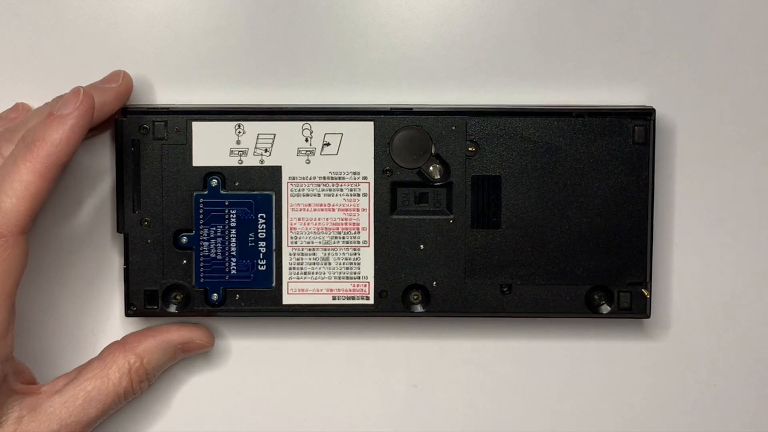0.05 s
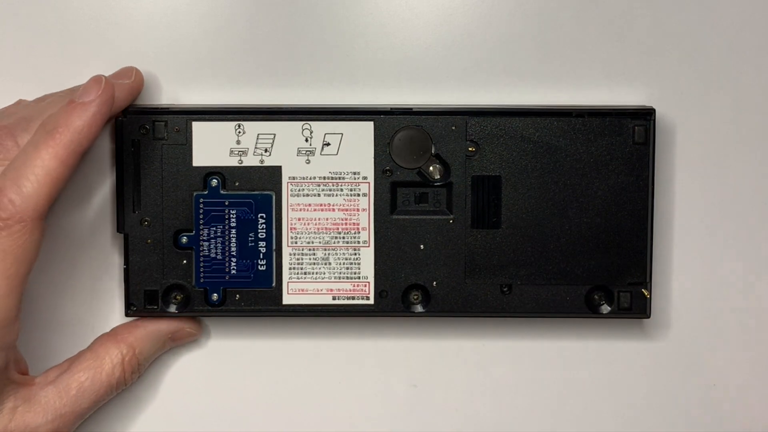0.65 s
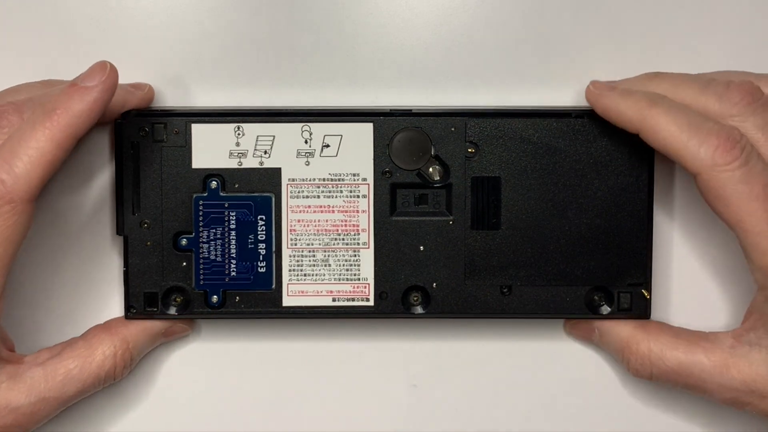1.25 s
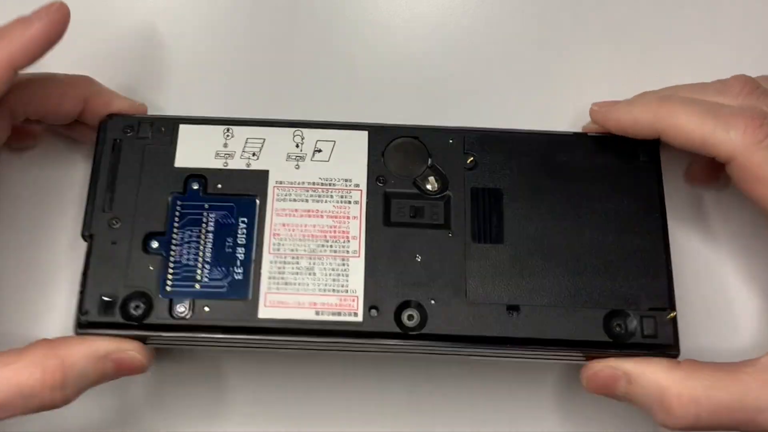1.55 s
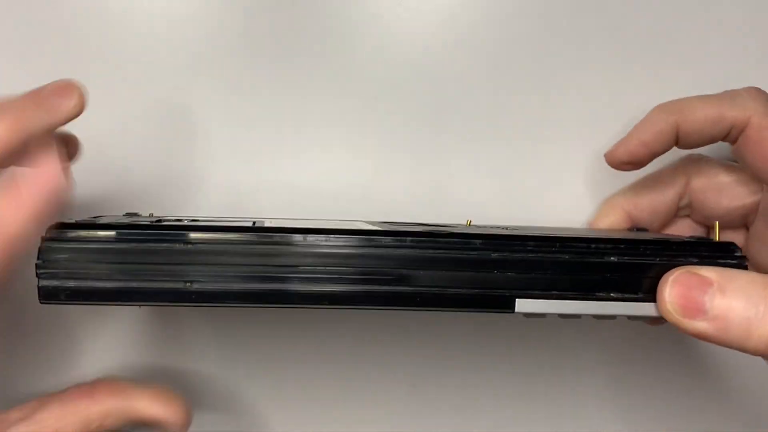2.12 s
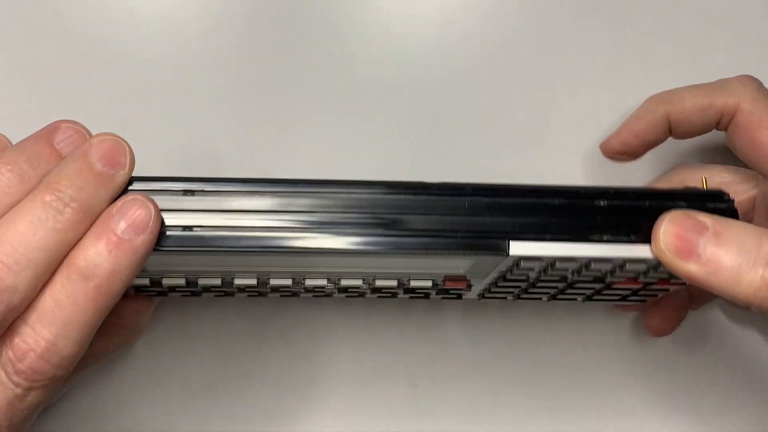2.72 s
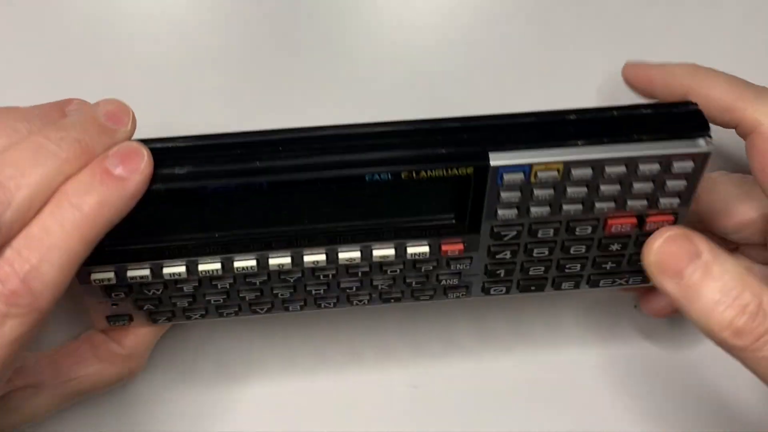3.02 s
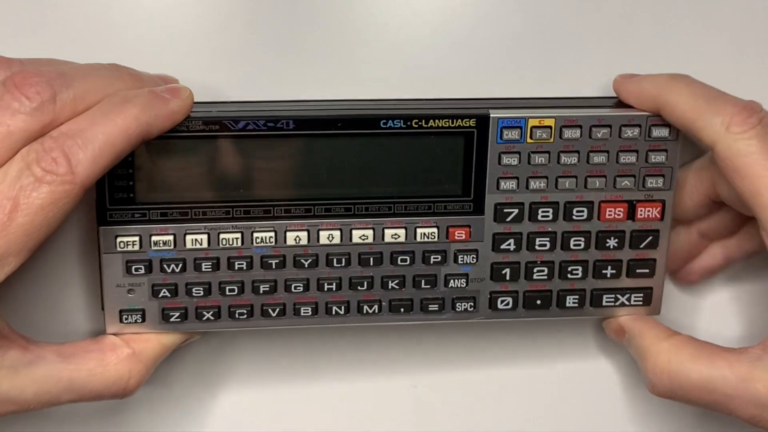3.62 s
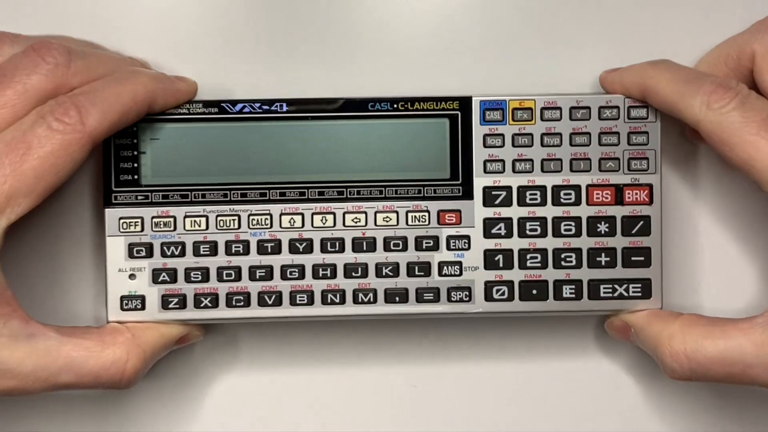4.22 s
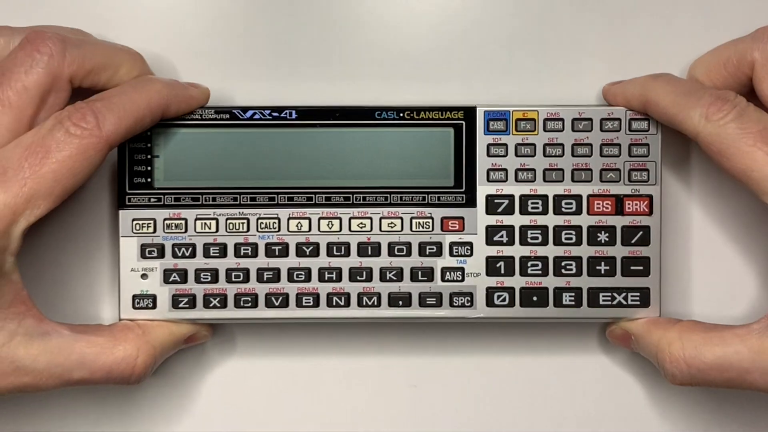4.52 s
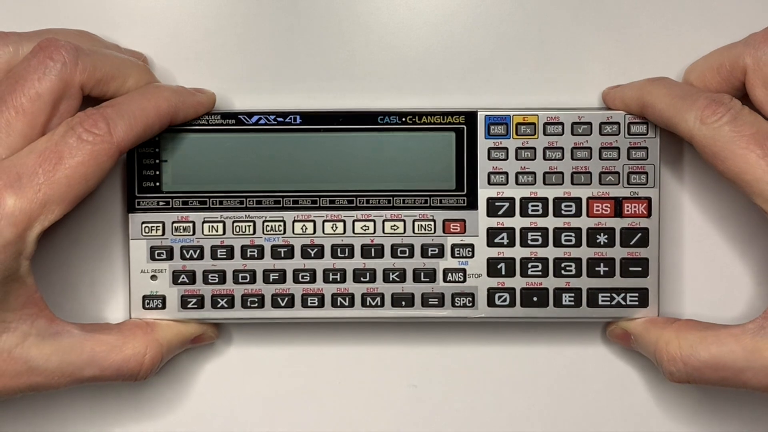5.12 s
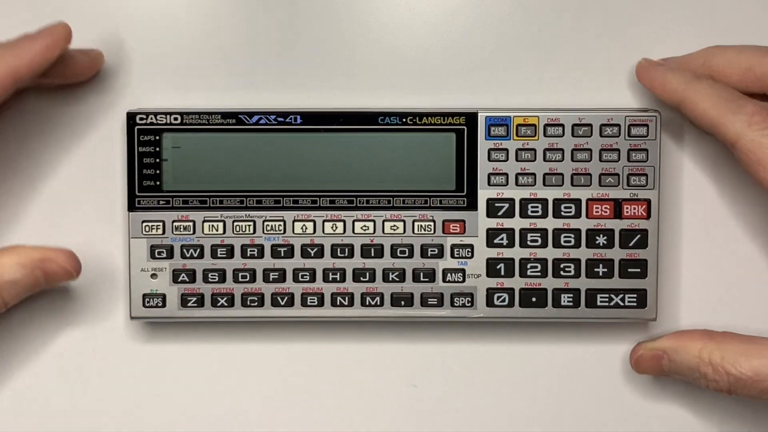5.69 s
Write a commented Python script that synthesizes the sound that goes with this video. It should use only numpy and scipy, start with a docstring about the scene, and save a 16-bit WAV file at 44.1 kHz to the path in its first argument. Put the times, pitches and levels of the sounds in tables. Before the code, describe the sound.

A small plastic device gives a couple of sharp, slightly rattling snaps as it is gripped. Light ticks and taps follow while hands turn it over, with soft rubbing, faint creaks and a brief finger squeak. Near the end it knocks onto a desk and rocks to rest with smaller bumps and a tiny metallic ping. The microphone is close, in a small room with a low ventilation rumble.

```python
"""Pocket computer handled at a desk

A small room, a stereo microphone close to the desk. A pocket computer in a plastic case is picked up,
turned over and set down. The case snaps and rings while it lies free, ticks dully once the hands damp
it, creaks and squeaks under sliding fingers, and at last knocks the desk top, jolting a loose metal
part. The room answers briefly, with a low ventilation rumble behind it all."""
import sys
import numpy as np
from scipy import signal
from scipy.fft import rfft, irfft, next_fast_len
from scipy.io import wavfile
from scipy.ndimage import uniform_filter1d

SR = 44100
rng = np.random.default_rng(int(sys.argv[2]) if len(sys.argv) > 2 else 0)


def wav_record(signal):
    """Record a signal, one row per channel, as 16-bit PCM in the file named by sys.argv[1]."""
    frames = np.transpose(np.atleast_2d(signal))
    bounded = np.clip(frames, -1, 1)
    # unit amplitude maps onto the largest positive 16-bit level
    quanta = np.round(bounded * 32767).astype(np.int16)
    wavfile.write(sys.argv[1], SR, quanta)


N = 253575


# snaps and their quick rebounds, close to the microphone: start_s, level_db, cutoff_hz, crack_db
SNAPS = [(0.1518, -30.5, 4200, -3.5), (0.1553, -30, 2000, -22), (0.161, -34, 1720, -13),
         (0.3227, -40, 14000, -13), (0.3357, -20.5, 17800, 2), (0.3375, -23.5, 13100, -0.5),
         (0.346, -40, 12000, 12)]
# modes of the case lying free on the desk: pitch_hz, level_db, t60_s
FREE_CASE_MODES = [(560, -30, 0.068), (760, -16, 0.061), (1175, 1, 0.079), (1375, -0.5, 0.03),
                   (1603, -2, 0.032), (1960, -1.5, 0.025), (2330, -17, 0.045), (2920, 7.5, 0.011),
                   (3760, 5, 0.0054), (4050, -15, 0.08), (6400, 12, 0.005), (7070, 12, 0.0064),
                   (8230, 4, 0.015), (8660, 11.5, 0.0071), (10600, 7.5, 0.005), (14200, 17, 0.0043)]

def snaps(rattle_db=-12):
    """A fingernail snaps against the case as it lies free on the desk; it rings freely and rattles."""
    out = np.zeros((2, N))
    for s, db, cutoff_hz, crack_db in SNAPS:
        hit = blow(FREE_CASE_MODES, cutoff_hz, crack_db, crack_t60=0.01, apart_hz=8100,
                   rise_cycles=0.58, crack_rise_s=0.0001)
        add(out, s, amp(db) * (with_room(hit, wet_db=-6) + amp(rattle_db) * rattle(cutoff_hz)))
    return out


# spectrum of chattering keys and covers: frequency_hz, density_db
CHATTER_SPECTRUM = [(150, -5), (550, 5.5), (900, 13.5), (2500, 2.5), (3800, 3), (4900, -3), (7000, -2),
                    (10500, -6), (15000, -23)]

def rattle(cutoff_hz, contacts_per_s=2500, scatter_db=4, t60=0.23):
    """Loose keys and covers chatter after a snap: dense tiny contacts that die away."""
    t = np.arange(SR * 2 // 5) / SR
    contacts = impulses(len(t), contacts_per_s, scatter_db)
    colour = lambda hz: amp(along(CHATTER_SPECTRUM, hz)) / np.hypot(1, (hz / cutoff_hz) ** 2)
    chatter = spread(filtered(contacts, colour), ROOM_LIKENESS) * amp(-60 * t / t60)
    return unit(chatter) * np.sqrt(.005 / t[-1])  # the energy of 5 ms at rms 1


# knocks on the desk: start_s, level_db, cutoff_hz, ring_share (of the ring time, left by the grip)
KNOCKS = [(1.22, -45.5, 420, 0.17), (4.8793, -18.5, 1520, 0.94), (4.902, -22, 378, 0.66),
          (4.936, -34, 260, 0.45), (5.1526, -32.5, 900, 0.74), (5.19, -28, 547, 0.45),
          (5.206, -29.5, 420, 0.46), (5.232, -30.5, 133, 0.55), (5.376, -33.5, 115, 0.9),
          (5.421, -39.5, 433, 0.9), (5.439, -25.5, 104, 0.21)]
# modes of the desk top: pitch_hz, level_db, undamped_t60_s
DESK_MODES = [(69.7, -3, 0.58), (116.7, -8, 0.55), (167, 0.5, 0.41), (200.3, -4.5, 0.21), (228.6, -2, 0.31),
              (287.5, -21.5, 0.88), (336, 21, 0.021), (388.6, -3.5, 0.22), (419, -14, 0.24),
              (475, -13.5, 0.29), (576, -10, 0.25), (701, -6.5, 0.1), (788, 7.5, 0.029), (1130, -4, 0.026)]

def knocks():
    """The gripped case nudges the desk; later one edge lands and rocks, then the other, and it settles."""
    out = np.zeros((2, N))
    for s, db, cutoff_hz, ring_share in KNOCKS:
        modes = np.array(DESK_MODES) * [1, 1, ring_share]
        hit = blow(modes, cutoff_hz, crack_db=-18, crack_t60=0.023, apart_hz=1900,
                   rise_cycles=0.53, crack_rise_s=0.00056)
        add(out, s, amp(db) * with_room(hit, wet_db=-10.5, build_s=0.0022))
    return out


# ticks against fingers or desk: start_s, level_db, cutoff_hz, shell_hz, part_hz, part_db, crack_db
TICKS = [(1.115, -58.5, 1300, 636, 1020, 25, -18), (1.2216, -45, 1490, 720, 950, 16, -22),
         (1.551, -44.5, 1630, 604, 890, 20.5, -9), (1.7277, -35, 14700, 640, 1960, 19, -3.5),
         (2.331, -58.5, 3500, 666, 2010, 17, -9), (2.6023, -32, 14200, 724, 690, 17, -5),
         (2.7862, -48.5, 1830, 890, 1500, 20.5, -1), (3.5378, -38, 12700, 703, 1300, 19.5, -3),
         (4.0235, -32.5, 980, 749, 1166, 21, -7), (4.059, -48, 1220, 850, 1200, 22, -7),
         (4.6065, -58, 14000, 890, 6840, 37, -4), (4.8767, -37, 3800, 775, 2080, 15.5, -1.5),
         (5.1495, -43.5, 2000, 710, 1950, 3, -12), (5.1868, -41, 2190, 744, 1940, 20, 3),
         (5.4197, -45.5, 2200, 666, 1280, 19.5, -2)]
# modes of the case in the hands: shell_pitch_ratio, level_db, t60_s
HELD_CASE_MODES = [(.84, -4, 0.05), (1, 10, 0.042), (1.2, -5, 0.015), (1.5, -24, .03), (2.05, 0, 0.023),
                   (2.9, 0, 0.026), (4.6, 17, 0.0076), (6.2, 11, 0.0046), (8.6, 11, .005), (15, -2, 0.0021)]

def ticks(part_t60=0.01):
    """Fingers tap and flex the case; the grip damps and retunes the shell, the touched part rings dryly."""
    out = np.zeros((2, N))
    for s, db, cutoff_hz, shell_hz, part_hz, part_db, crack_db in TICKS:
        shell = np.array(HELD_CASE_MODES) * [shell_hz, 1, 1]
        modes = np.vstack([(part_hz, part_db, part_t60), shell])
        hit = blow(modes, cutoff_hz, crack_db, crack_t60=0.013, apart_hz=4230,
                   rise_cycles=1.3, crack_rise_s=0.000057)
        add(out, s, amp(db) * with_room(hit, wet_db=-9.5, build_s=0.00063))
    return out


# pings as the case comes to rest on the desk: start_s, level_db
PINGS = [(5.4205, -42), (5.443, -53)]
# modes of the metal part: pitch_hz, level_db, t60_s
METAL_MODES = [(2660, 6, 0.029), (4150, -7, 0.022), (5630, -9, 0.028)]

def pings():
    """A small loose metal part is jolted and rings briefly."""
    out = np.zeros((2, N))
    for s, db in PINGS:
        hit = blow(METAL_MODES, cutoff_hz=9000, crack_db=-20, crack_t60=0.005, apart_hz=6000,
                   rise_cycles=2.6, crack_rise_s=0.00024)
        add(out, s, amp(db) * with_room(hit, wet_db=-14))
    return out


# crack of plastic at close range: frequency_hz, density_db
CRACK_SPECTRUM = [(200, 0.5), (600, -25), (1200, 13), (2000, 4.5), (3500, 15), (4900, -1), (6300, 10.5),
                  (8000, 2.5), (11000, -7), (16000, -15.5)]
# the direct crack across the microphone pair: frequency_hz, left_right_likeness
CRACK_LIKENESS = [(1000, 0.13), (7000, 0.45)]

def blow(modes, cutoff_hz, crack_db, crack_t60, apart_hz, rise_cycles, crack_rise_s):
    """One contact: ringing modes and a short crack; a softer touch has a lower cutoff and sounds duller."""
    hz, db, t60 = np.transpose(modes)[:, :, None]
    t = np.arange(SR * 2 // 5) / SR
    # higher modes reach the two microphones further apart in phase
    apart = rng.normal(0, 1, (2, len(hz), 1)) * np.minimum(hz / apart_hz, 1)
    phase = np.pi * np.arange(len(hz))[:, None] + apart  # neighbouring modes swing opposite ways
    size = amp(db + rng.normal(0, 1, hz.shape))
    envelope = amp(-60 * t / t60) * (1 - np.exp(-(t * hz / rise_cycles) ** 2))
    ring = (size * envelope * np.sin(2 * np.pi * hz * t + phase)).sum(1)
    crack = spread(noise(CRACK_SPECTRUM, (2, len(t))), CRACK_LIKENESS)
    crack *= amp(-60 * t / crack_t60) * (1 - np.exp(-t / crack_rise_s))
    lowpass = signal.butter(3, cutoff_hz, fs=SR, output="sos")
    hit = signal.sosfilt(lowpass, unit(ring) + amp(crack_db) * unit(crack))
    return unit(to_microphones(hit)) * np.sqrt(.005 / t[-1])  # the energy of 5 ms at rms 1


# rasp of skin on the shell, hiss of dry skin, thud of the hands; each: frequency_hz, density_db
RASP_SPECTRUM = [(250, -60), (550, 16.5), (780, 19.5), (1050, 14), (1800, 16.5), (3300, 1.5), (5000, -8),
                 (15000, -29)]
HISS_SPECTRUM = [(1000, -68), (4000, 19), (5500, 4.5), (7000, 21), (9000, 18.5), (11000, 14), (15000, -102)]
THUD_SPECTRUM = [(30, -72), (70, -3), (125, 25), (200, -2.5), (320, -3.5), (600, -48), (2000, -69)]

def rubbing(slips_per_s=1500, scatter_db=3):
    """Skin slides over the shell in many tiny slips; dry skin hisses and the shifting hand thuds softly."""
    slips = impulses(N, slips_per_s, scatter_db)
    rasp = filtered(slips, lambda hz: amp(along(RASP_SPECTRUM, hz)))
    hiss = noise(HISS_SPECTRUM, (2, N))
    thud = noise(THUD_SPECTRUM, (2, N))
    layers = np.array([unit(spread(x, ROOM_LIKENESS)) for x in (rasp, hiss, thud)])
    return with_room((friction() * layers).sum(0), wet_db=-9)


# the shifting grip of the hands that carry the case: time_s, level_db
GRIP = [(0.9, -75), (1.27, -48.5), (1.56, -64.5), (2.4, -55), (2.53, -48.5), (2.66, -59), (2.84, -49.5),
        (2.89, -68), (3.41, -48.5), (3.53, -69), (3.64, -43), (3.99, -87), (4.79, -50.5), (4.849, -63)]
# fingers sliding over the case: middle_s, length_s, rasp_db, hiss_db
SLIDES = [(1.21, 0.052, -63, -83), (1.305, 0.084, -75, -83), (1.944, 0.18, -68.5, -74),
          (2.308, 0.14, -72, -66.5), (2.472, 0.06, -97, -64), (2.915, 0.12, -68, -69),
          (3.51, 0.13, -61, -71), (3.78, 0.24, -69, -72), (4.25, 0.099, -51, -57.5),
          (4.619, 0.043, -81, -53), (5.387, 0.14, -68, -64.5)]

def friction(medium_hz=1950, scuff_db=-6.5, longest_scuff_s=0.044, scrape_db=-26, scrape_s=0.044):
    """Envelopes of rasp, hiss and thud: the grip drives all three; slides, ticks and snaps add swells."""
    def stroke(track, middle_s, length_s, db):
        add(track, middle_s - length_s / 2, amp(db) * swell(length_s)[None])

    grip_s, grip_db = np.transpose(GRIP)
    grip = amp(np.interp(np.arange(N) / SR, grip_s, grip_db, left=-np.inf, right=-np.inf))[None]
    rasp, hiss, thud = grip * amp(-21.5), grip * amp(-27), grip * amp(-1.5)
    for s, length_s, rasp_db, hiss_db in SLIDES:
        stroke(rasp, s, length_s, rasp_db)
        stroke(hiss, s, length_s, hiss_db)
    for s, db, cutoff_hz, *_ in TICKS:
        hardness = np.log2(cutoff_hz / medium_hz)  # octaves brighter than a medium contact
        length_s = min(0.22 * 0.53 ** hardness, longest_scuff_s)
        # a fleshy contact scuffs much less than a medium one, a hard contact slightly less
        touch_db = 20 * min(hardness, 0) - max(hardness, 0)
        stroke(rasp, s + length_s / 4, length_s, db + scuff_db + touch_db)
    for s, db, cutoff_hz, *_ in SNAPS:
        touch_db = 20 * min(np.log2(cutoff_hz / medium_hz), 0)
        stroke(rasp, s, scrape_s, db + scrape_db + touch_db)
    return np.array([rasp, hiss, thud])


# fingertips that stick and slip on the shell: middle_s, length_s, level_db
SQUEAKS = [(1.305, 0.064, -66), (1.958, 0.055, -60), (4.221, 0.018, -50), (4.237, 0.015, -39),
           (4.259, .028, -43.5), (4.333, 0.014, -50), (4.356, 0.015, -54)]

def squeaks(shell_hz=772, waver=0.023, overtone_db=-17):
    """A dragging fingertip locks onto the lowest mode of the shell and makes it sing briefly."""
    out = np.zeros((2, N))
    for s, length_s, db in SQUEAKS:
        pressure = swell(length_s)
        drift = unit(uniform_filter1d(rng.standard_normal(len(pressure)), size=100))
        phase = 2 * np.pi * np.cumsum(shell_hz * (1 + waver * drift)) / SR
        overtones = sum(np.sin(k * phase) * 2 / k for k in range(2, 6))
        tone = unit(np.sin(phase) + amp(overtone_db) * overtones)
        add(out, s - length_s / 2, amp(db) * (pressure * tone)[None])
    return with_room(out, wet_db=-8)


# faint creaks of the strained case: middle_s, length_s, level_db, pitch_hz
CREAKS = [(3.515, 0.048, -60, 1680), (3.597, 0.054, -54.5, 540), (3.686, 0.027, -57.5, 1600),
          (3.706, 0.043, -65, 1700), (3.737, .025, -60, 1560), (3.749, 0.051, -62.5, 2640),
          (3.792, 0.05, -60.5, 720), (3.897, .026, -58, 1090), (5.187, 0.022, -61, 2000),
          (5.213, .03, -54, 1350), (5.355, 0.06, -58, 660)]

def creaks(slips_per_s=260, gap_scatter=0.19, scatter_db=4, t60=0.02):
    """The case creaks under a shifting grip: uneven slips, each ringing the strained part briefly."""
    out = np.zeros((2, N))
    t = np.arange(SR // 20) / SR
    for s, length_s, db, hz in CREAKS:
        strain = swell(length_s)
        gaps, sizes = rng.standard_normal((2, 64))
        slip_samples = (np.cumsum(np.exp(gap_scatter * gaps)) / slips_per_s * SR).astype(int)
        slips = np.bincount(slip_samples, amp(scatter_db * sizes), len(strain))[:len(strain)]
        ring = amp(-60 * t / t60) * np.sin(2 * np.pi * hz * t)
        creak = signal.fftconvolve(slips * strain, ring)
        strain_rms = np.sqrt(np.sum(strain ** 2) / len(creak))
        add(out, s - length_s / 2, amp(db) * strain_rms * unit(creak)[None])
    return with_room(to_microphones(out), wet_db=-8)


# decay of the small room: frequency_hz, t60_s
ROOM_DECAY = [(100, 0.32), (400, 0.28), (1200, 0.31), (4000, 0.24), (8000, 0.23), (10500, 0.13),
              (15000, 0.036)]
# diffuse sound across the microphone pair: frequency_hz, left_right_likeness
ROOM_LIKENESS = [(150, 0.96), (400, 0.42), (900, 0.065), (2000, 0.86), (8000, 0.92)]

def with_room(x, wet_db, build_s=0.00092):
    """The room adds a diffuse tail to the close sound, each frequency dying at its own speed."""
    hz, t, bands = signal.stft(rng.standard_normal((2, SR // 2)), SR, nperseg=256)
    decay = amp(-60 * t / along(ROOM_DECAY, hz)[:, None])
    tail = spread(signal.istft(bands * decay, SR, nperseg=256)[1], ROOM_LIKENESS)
    tail *= 1 - np.exp(-(np.arange(tail.shape[1]) / SR / build_s) ** 2)
    tail /= np.linalg.norm(tail[0])
    return x + amp(wet_db) * signal.fftconvolve(x, tail, axes=1)[:, :x.shape[1]]


# room tone at the desk: frequency_hz, density_db
ROOM_TONE_SPECTRUM = [(15, -69), (30, -28), (50, 3.5), (80, -3), (120, -1.5), (190, -15), (290, -14.5),
                      (450, -23), (1000, -25), (2200, -28.5), (4000, -30.5), (5200, -35), (9500, -31.5),
                      (11000, -34), (12500, -32), (15500, -43)]
# room tone across the microphone pair: frequency_hz, left_right_likeness
ROOM_TONE_LIKENESS = [(120, 0.94), (290, -0.16), (700, -0.63), (5000, -0.25), (8500, 1), (10500, 0.35),
                      (12000, -1.92), (15000, 0.52)]

def room_tone(level_db=-51.5):
    """Ventilation rumble under a thin, even microphone hiss."""
    return amp(level_db) * unit(spread(noise(ROOM_TONE_SPECTRUM, (2, N)), ROOM_TONE_LIKENESS))


def to_microphones(x, left_lead_s=0.00011):
    """Direct sound reaches the left microphone slightly ahead of the right."""
    return filtered(x, lambda hz: np.exp(1j * np.pi * hz * left_lead_s * np.array([[1], [-1]])))


def spread(pair, likeness):
    """Two unrelated signals as left and right, with a likeness that depends on frequency."""
    angle = lambda hz: np.arccos(np.clip(along(likeness, hz), -1, 1)) / 2
    mid, side = filtered(pair, lambda hz: np.array([np.cos(angle(hz)), np.sin(angle(hz))]))
    return np.array([mid + side, mid - side])


def impulses(n, per_s, scatter_db):
    """Tiny contacts at random times and of random size, on two channels."""
    occurs = rng.random(n) < per_s / SR
    return occurs * amp(scatter_db * rng.standard_normal(n)) * rng.standard_normal((2, n))


def noise(spectrum, shape):
    """Coloured noise of rms 1."""
    return unit(filtered(rng.standard_normal(shape), lambda hz: amp(along(spectrum, hz))))


def filtered(x, response):
    """Filter x by a function of frequency."""
    n = x.shape[-1]
    padded = next_fast_len(n + 8192)
    return irfft(rfft(x, padded) * response(np.fft.rfftfreq(padded, 1 / SR)), padded)[..., :n]


def along(points, hz):
    """Interpolate (frequency_hz, value) points on a log axis."""
    point_hz, values = np.transpose(points)
    return np.interp(np.log(hz + 1), np.log(point_hz + 1), values)


def swell(length_s):
    """A smooth rise and fall."""
    return np.hanning(round(length_s * SR))


def amp(db):
    """Decibels to gain."""
    return 10 ** (db / 20)


def unit(x):
    """Scale to rms 1."""
    return x / np.sqrt(np.mean(x ** 2) + 1e-20)


def add(track, start_s, x):
    """Mix x into the track."""
    part = track[:, round(start_s * SR):][:, :x.shape[1]]
    part += x[:, :part.shape[1]]


def scene():
    """Close handling, a little louder on the right, over the room tone."""
    handling = snaps() + ticks() + pings() + knocks() + rubbing() + squeaks() + creaks()
    rightward = np.array([[-1], [1]])
    return handling * amp(0.9 * rightward) + room_tone() * amp(0.3 * rightward)


def record(dry, top_hz=16700):
    """The camera beside the desk keeps nothing above its band limit."""
    return filtered(dry, lambda hz: hz < top_hz)


dry = scene()
out = record(dry)
wav_record(out)
```